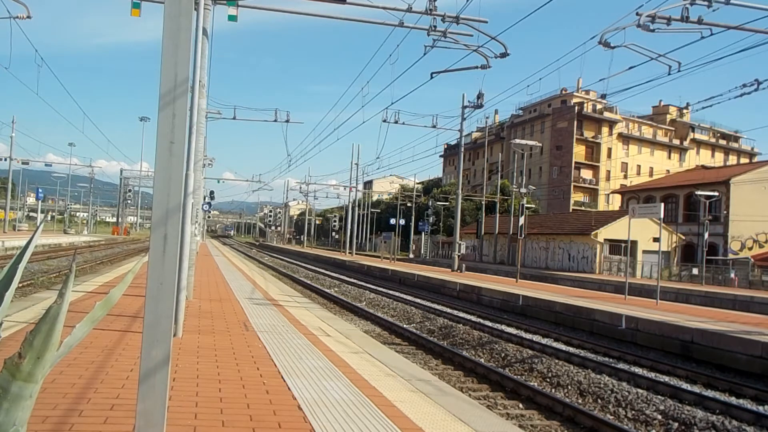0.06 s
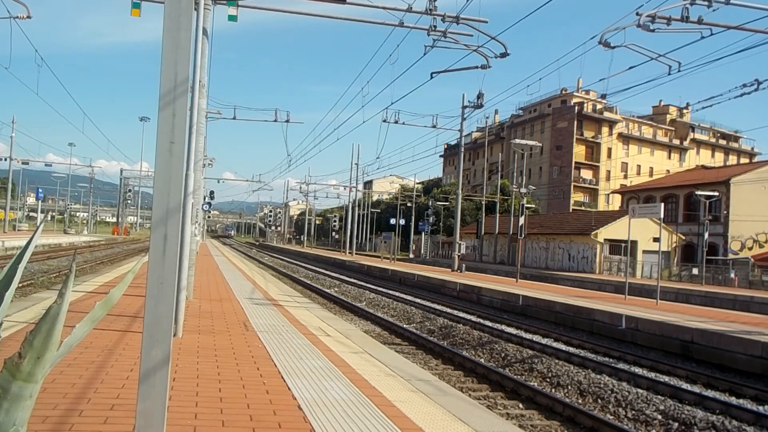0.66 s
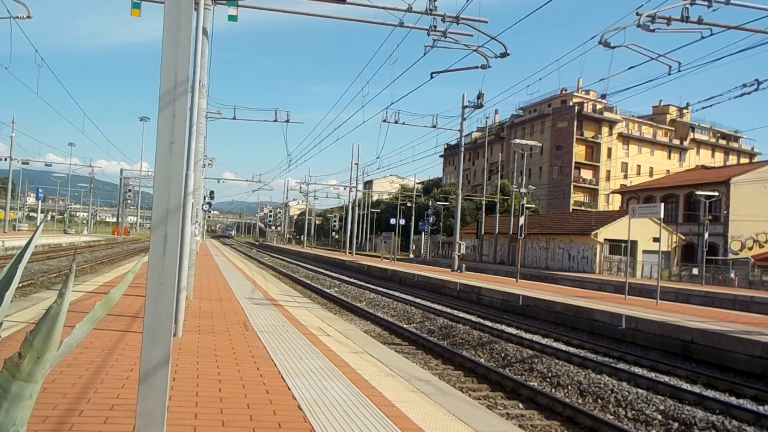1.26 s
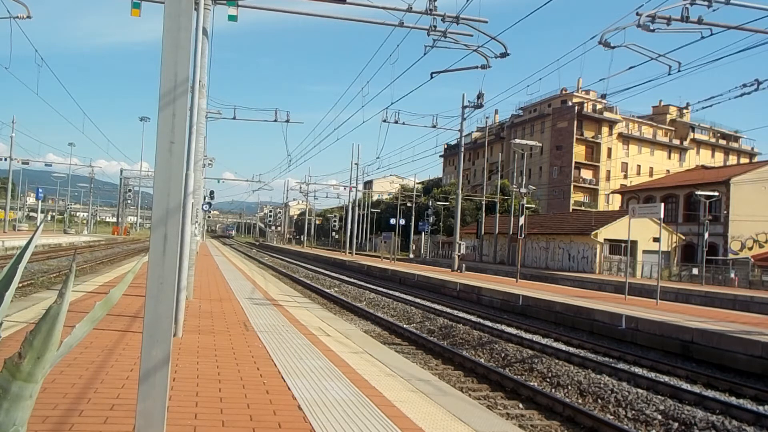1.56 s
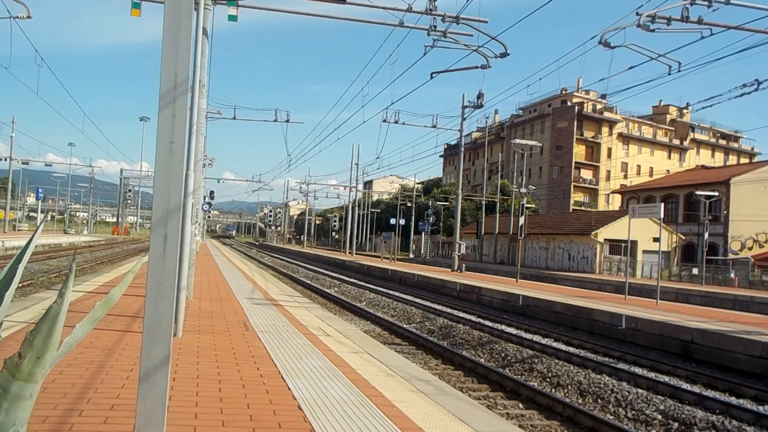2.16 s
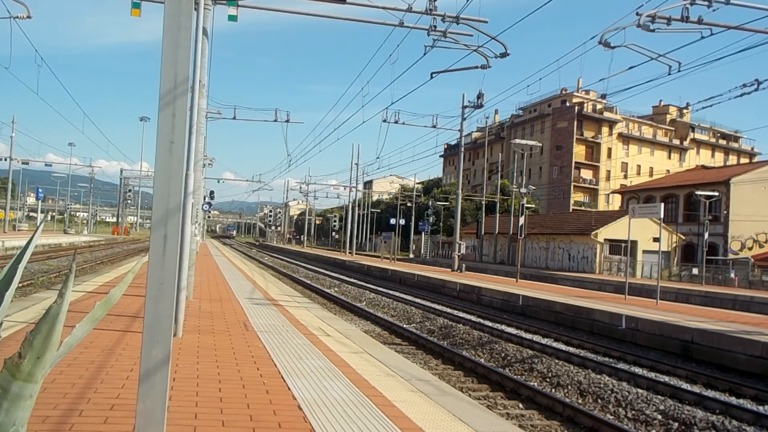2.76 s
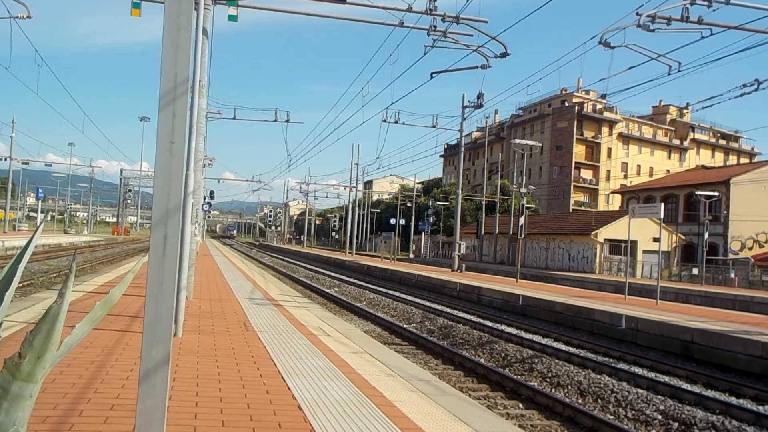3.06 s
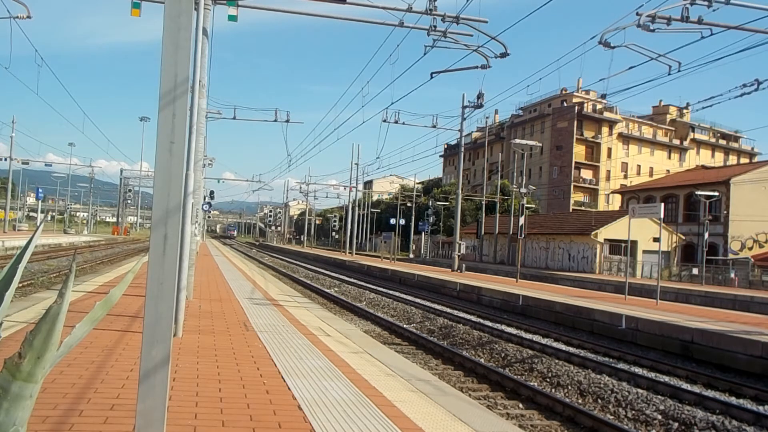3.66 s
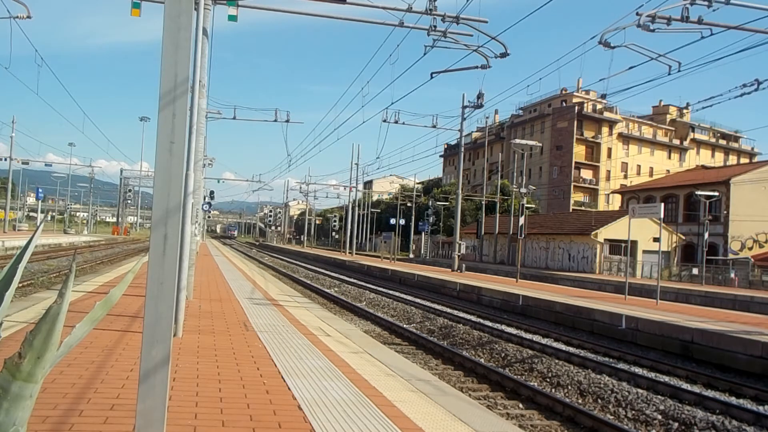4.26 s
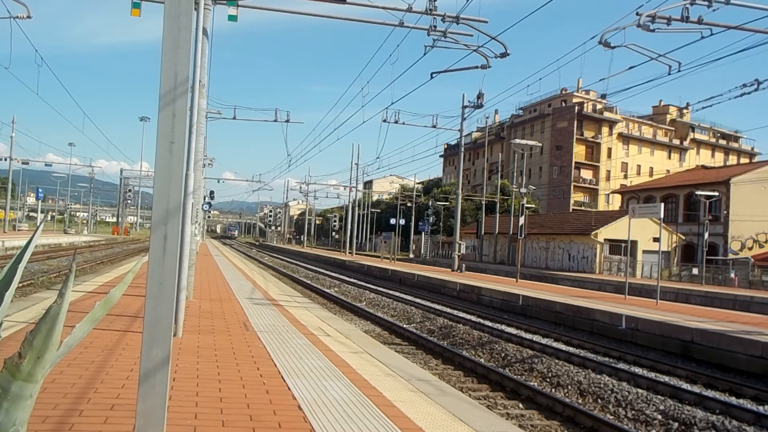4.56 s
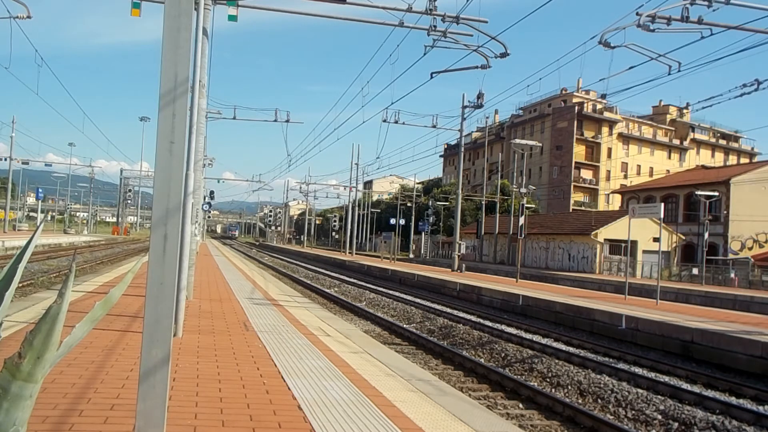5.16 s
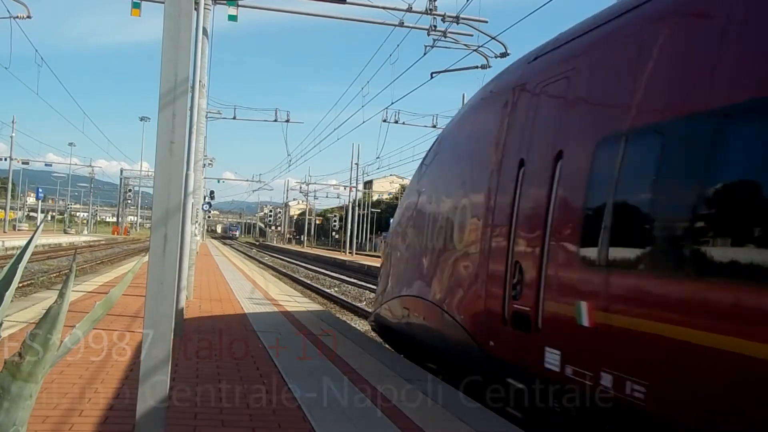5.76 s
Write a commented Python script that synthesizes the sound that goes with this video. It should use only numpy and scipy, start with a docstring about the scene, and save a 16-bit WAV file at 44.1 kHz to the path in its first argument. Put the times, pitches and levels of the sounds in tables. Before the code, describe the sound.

From a stereo microphone on a platform beside the track, a far-off electric train is heard as a metallic hum and sizzle in the rails, with occasional double clacks. It grows steadily into a deep rolling roar with rushing air. The clacks bunch together as the train speeds past after about five seconds, a wheel whines briefly downward in pitch, and the loudest hits overload into sharp ticks.

```python
"""A fast electric train, heard from a station platform through a stereo microphone near the track.
At first it is over 100 m off: the rails sing ahead of it and carry its knocks, two for each bogie
that crosses a joint. The roar of rough wheels on rough rails swells and deepens, and displaced air
rushes in. Just after five seconds the train passes some 8 m from the microphone and a wheel whines,
falling in pitch. The loudest knocks overload the recorder, which crackles."""
import sys
import numpy as np
from scipy import signal
from scipy.fft import rfft, irfft
from scipy.io import wavfile

SR = 44100
rng = np.random.default_rng(int(sys.argv[2]) if len(sys.argv) > 2 else 0)


def to_wav(s):
    """Save 16-bit WAV."""
    ch = np.atleast_2d(s).T  # columns
    pcm = np.round(np.clip(ch, -1, 1) * 32767)  # PCM
    wavfile.write(sys.argv[1], SR, pcm.astype(np.int16))


N = 264600
TIME = np.arange(N) / SR
BINS = np.maximum(np.fft.rfftfreq(N, 1 / SR), 1)

SPEED_M_PER_S, WHEELBASE_M, SOUND_M_PER_S = 23.8, 3.0, 343
# the leading bogie draws level with the microphone at PASS_S; from then on bogies stay NEAREST_M away
PASS_S, NEAREST_M = 5.27, 8.53
# fading with distance: (level at the nearest [dB], loss per tenfold distance [dB], track loss [dB/m])
ROAR_FADE = (-16, 7.91, 0.074)
WHEEL_FADE = (-24, 14.87, 0.043)
HISS_FADE = (-31, 16.2, 0.069)
RUMBLE_FADE = (-50.5, 12, 0.067)
RUSH_FADE = (-32, 1.7, 0.1)

# rolling roar from far down the line: (frequency [Hz], level [dB])
FAR_ROAR = [(250, -33.5), (350, -39), (450, -13.5), (520, -13), (600, -3), (720, 0.5), (810, -0.5),
            (940, 2.5), (1040, -3), (1130, -10.5), (1400, -20), (2000, -71)]
# rolling roar at the platform: (frequency [Hz], level [dB])
NEAR_ROAR = [(120, -44), (220, -33.5), (300, -30), (380, -13.5), (500, -5), (660, 7), (780, 7.5),
             (900, 0.5), (1040, 8), (1150, -5.5), (1400, -29.5), (2000, -86.5)]
# ringing of the wheels: (frequency [Hz], level [dB])
WHEEL_RING = [(800, -39.5), (1100, 4), (1220, 2), (1500, 0), (1650, -2), (1780, -5), (1960, -5.5),
              (2150, -16.5), (2420, -33.5), (3000, -40)]
# hiss of wheel on rail: (frequency [Hz], level [dB])
CONTACT_HISS = [(2000, -53.5), (2480, -23), (2780, -12.5), (2970, -17), (3250, -2), (3550, 1.5), (4100, -2),
                (5000, -5.5), (6000, -14), (6900, -14.5), (7700, -16.5), (8600, -26), (10500, -46),
                (13000, -62.5)]
# peaks and dips in the sound that the rails carry: (frequency [Hz], width [Hz], gain [dB])
RAIL_MODES = [(464, 30, 8), (597.6, 15, 7.5), (666, 41, 5), (748, 19, -5.5), (800, 55, 7), (939.7, 32, 7),
              (1032, 25, 7), (1270, 41, 4), (1320.6, 26, 11), (1450, 16, 1.5), (3440, 500, 1),
              (5340, 940, -1), (6260, 540, -2.5)]
# the rolling noise swells and sags about its steady rise: (time [s], gain [dB])
SWELL = [(0, -0.6), (.8, 0.96), (2.2, -0.1), (2.76, -1.5), (3.02, 1.5), (3.47, -2.3), (3.64, 2.9),
         (4.1, -0.06), (4.7, 0.2), (5.15, 0.5), (5.45, -2.4), (5.63, 0), (5.83, -4.5), (6, -2.5)]
# a bogie crosses a rail joint: (time [s], first axle's thud [dB], second axle's thud [dB],
# wheel clang against the thud [dB], rail sizzle against the thud [dB])
JOINT_CROSSINGS = [(.064, -34, -45, -11, -19), (.284, -26, -44, -24, -34), (1.266, -37.5, -33.5, -2.5, -31),
                   (2.408, -22, -28.5, -24, -38), (2.853, -18, -19.5, -11, -19.5),
                   (3.581, -16.5, -21, -17.5, -19), (4.152, -10.5, -17.5, -17, -29),
                   (4.342, -14.5, -27, -21, -30), (4.837, -12.5, -18, -13, -19.5),
                   (5.000, -12.5, -16.5, -13.5, -38), (5.178, -13, -18.5, -7, -27),
                   (5.275, -17.5, -17, -3.5, -12), (5.315, -13.5, -22, -4.5, -22),
                   (5.400, -17, -12, -10.5, -21), (5.424, -18, -28.5, -4, -17),
                   (5.443, -8.5, -10.5, -19, -41)]
# a blow sets the rail head ringing: (frequency [Hz], width [Hz], gain [dB])
RAIL_HEAD_MODES = [(4250, 2400, 8), (7000, 3100, 7)]
# the wheel's whine flares up near the microphone: (time [s], half length [s], level [dB])
WHINE_FLARES = [(5.216, 0.054, -22), (5.545, 0.054, -26), (5.72, .07, -25.5)]
# rumble of displaced air: (frequency [Hz], level [dB])
AIR_RUMBLE = [(15, 9.5), (30, -2.5), (60, 4.5), (120, 0), (200, 4), (320, 3), (600, -23)]
# air rushing round the bogies: (frequency [Hz], level [dB])
AIR_RUSH = [(150, -25.5), (260, -15.5), (340, -5), (420, 2), (500, 6.5), (700, -27)]
# the rails' high sizzle, far ahead of the train: (frequency [Hz], level [dB])
SING_SPECTRUM = [(5200, -28.5), (6000, -11), (6900, 0), (7500, -1.5), (8200, -21)]
# rise of that sizzle at the platform: (time [s], level [dB])
SING_LEVEL = [(0, -80), (.9, -74.5), (1.6, -65), (2.3, -65), (3.2, -63.5), (4.2, -56)]
# the two microphone ports: (frequency [Hz], left over right [dB], lag of left [rad], likeness [0-1])
MIC_PORTS = [(100, .5, -1, .55), (227, 0, 1.1, 0.8), (320, 5, 0.75, 1), (420, 5, 0.84, 0.82),
             (645, -1.5, 1.01, 0.94), (746, 0.1, 0.85, 1), (1050, -4.5, 1.01, 0.86), (1350, -6, 0.82, 1),
             (1880, -6, 0.75, 1), (2450, -3, -1.5, 0.9), (3230, 0, 0.5, 1), (4600, -3, 0.96, 0.3),
             (5860, -1, 1.5, 0.8), (7300, -9, 3, 0.3), (8600, -1.5, 2, 0.4), (12000, -6.5, 0, .3)]
# the recorder's equaliser, after its input stage: (frequency [Hz], gain [dB])
TREBLE_LIFT = [(5000, 3), (9500, 12.5), (14000, 26)]
# electronic hiss, mostly in the lifted treble: (frequency [Hz], level [dB])
SELF_NOISE = [(2500, -12.5), (8200, -11.5), (9500, -3), (11500, 1), (15500, -0.5)]


def rolling():
    """Rough wheels on rough rails; the rail's resonances fade as the bogies near the microphone."""
    near = nearness()
    swell_db, = in_time(SWELL)
    contact = drift(2.2)   # unevenness of the contact, felt in every band

    def arriving(far_spectrum, near_spectrum):
        """Sound carried by the rails gives way to sound straight from the bogies."""
        by_rail = np.sqrt(1 - near) * noise(colour(far_spectrum, RAIL_MODES))
        return by_rail + np.sqrt(near) * noise(colour(near_spectrum))

    roar = arriving(FAR_ROAR, NEAR_ROAR) * from_db(faded_db(ROAR_FADE) + swell_db + 0.42 * contact)
    wheels = arriving(WHEEL_RING, WHEEL_RING) * from_db(faded_db(WHEEL_FADE) + swell_db + 0.3 * contact)
    hiss_db = faded_db(HISS_FADE) + 0.56 * swell_db + 0.94 * contact
    hiss = arriving(CONTACT_HISS, CONTACT_HISS) * from_db(hiss_db + 0.85 * drift(30))
    return roar + wheels + hiss


def knocks(far_thud_hz=837, near_thud_hz=1084.3, hz_per_clang_db=18, max_lead_s=0.025, max_lead_m=63):
    """Bending waves run faster in the treble, so a far knock arrives as a sizzle and then a thud."""
    near, ahead = nearness(), track_ahead()
    clang = noise(colour(WHEEL_RING, RAIL_MODES))
    sizzle = noise(colour(CONTACT_HISS, RAIL_HEAD_MODES))
    # the sleepers' low thump travels through the air, so it fades with distance
    thump = noise(colour(AIR_RUSH) + from_db(-26) * colour(AIR_RUMBLE)) * np.sqrt(near + 0.1)
    cluster = mode_cluster(width_hz=200)
    thuds, rest = np.zeros((2, 2, N))
    for s, thud_db, clang_db, sizzle_db in axle_blows():
        at = int(s * SR)
        # close by, a blow with more clang also thuds higher
        close_hz = near_thud_hz + hz_per_clang_db * (clang_db - thud_db)
        hz = (1 - near[at]) * far_thud_hz + near[at] * close_hz
        lead_s = max_lead_s * min(ahead[at] / max_lead_m, 1)
        span = slice(max(int((s - .1) * SR), 0), int((s + .4) * SR))
        age = TIME[span] - s
        thud = (cluster[:, span] * np.exp(2j * np.pi * hz * age)).real
        thuds[:, span] += thud * from_db(thud_db) * burst(age, 0.019, 0.01, 0.18)
        rest[:, span] += thump[:, span] * from_db(thud_db - 15.5) * burst(age, 0.012, 0.0051, 0.063)
        rest[:, span] += clang[:, span] * from_db(clang_db) * burst(age, 0.018, 0.0063, 0.11)
        rest[:, span] += sizzle[:, span] * from_db(sizzle_db) * burst(age + lead_s, 0.0085, 0.0098, 0.18)
    # keep the thuds in the middle range, 480-1300 Hz
    thud_band = signal.butter(3, [480, 1300], "band", fs=SR, output="sos")
    return rest + signal.sosfilt(thud_band, thuds)


def axle_blows():
    """A bogie strikes twice, a wheelbase apart: (time [s], thud [dB], clang [dB], sizzle [dB])."""
    for s, first_db, second_db, clang_db, sizzle_db in JOINT_CROSSINGS:
        for delay, thud_db in ((0, first_db), (WHEELBASE_M / SPEED_M_PER_S, second_db)):
            yield s + delay, thud_db, thud_db + clang_db, thud_db + sizzle_db


def mode_cluster(width_hz):
    """The slow wandering of a cluster of close modes, centred on 0 Hz, with its strength evened."""
    band = signal.hilbert(noise(1 / (1 + ((BINS - SR / 4) / width_hz) ** 4)))
    evened = rms_one(band / np.abs(band) ** .7)
    return evened * np.exp(-.5j * np.pi * np.arange(N))   # shift down from SR / 4


def burst(age, rise_s, hold_s, t60_s):
    """Envelope of a blow: it builds up, holds while the wheel crosses, and dies."""
    return np.clip(1 + age / rise_s, 0, 1) ** 2 * from_db(-60 * np.maximum(age - hold_s, 0) / t60_s)


def wheel_whine(rest_hz=1604, width_hz=32, mic_distance_m=3.6):
    """One wheel mode, shaken at random by the rail; its Doppler shift falls as it passes."""
    ahead = SPEED_M_PER_S * (PASS_S - TIME)
    closing_speed = SPEED_M_PER_S * ahead / np.hypot(ahead, mic_distance_m)
    phase = 2 * np.pi * np.cumsum(rest_hz / (1 - closing_speed / SOUND_M_PER_S)) / SR
    tone = rms_one(drift(width_hz) * np.cos(phase) + drift(width_hz) * np.sin(phase))
    flares = sum(from_db(db) * np.exp(-((TIME - s) / half) ** 2) for s, half, db in WHINE_FLARES)
    return np.array([tone * flares, np.zeros(N)])   # all direct, none scattered


def displaced_air(screen_m=43, edge_m=3.6, screen_db=-12):
    """Air rumbles and rushes round the bogies; the rush is screened until they are screen_m away."""
    screened = (1 + np.tanh((track_ahead() - screen_m) / edge_m)) / 2
    rumble = noise(colour(AIR_RUMBLE)) * from_db(faded_db(RUMBLE_FADE) + 0.41 * drift(8))
    rush_db = faded_db(RUSH_FADE) + screen_db * screened
    return rumble + noise(colour(AIR_RUSH)) * from_db(rush_db + 2.0 * drift(6.2))


def rail_sing():
    """A thin, restless sizzle carried along the steel to the platform."""
    level_db, = in_time(SING_LEVEL)
    return noise(colour(SING_SPECTRUM)) * from_db(level_db + 1.1 * drift(12))


def microphone(sound, notch_hz=8090, notch_width_hz=840):
    """The housing shades and delays each port in its own way and cuts one narrow notch."""
    balance_db, lag, alike = in_frequency(MIC_PORTS)
    alike = np.clip(alike, 0, .999)
    direct, scattered = rfft(sound)
    common, apart = np.sqrt((1 + alike) / 2) * direct, np.sqrt((1 - alike) / 2) * scattered
    tilt = from_db(balance_db / 2) * np.exp(-.5j * lag)
    tilt_rms = np.sqrt((np.abs(tilt) ** 2 + np.abs(tilt) ** -2) / 2)
    left, right = (common + apart) * tilt, (common - apart) / tilt
    offset = (BINS - notch_hz) / notch_width_hz
    notch = np.abs(offset) / np.sqrt(1 + offset ** 2)
    return irfft(np.array([left, right]) * notch / tilt_rms, N)


def overload(x, knee=0.48, squash=0.47):
    """The input stage squashes crests above a sharp knee; the treble lift turns corners into ticks."""
    lift = colour(TREBLE_LIFT)
    unlifted = irfft(rfft(x) / lift, N)
    crests = unlifted - np.clip(unlifted, -knee, knee)
    return irfft(rfft(unlifted - squash * crests) * lift, N)


def track_ahead():
    """Metres that the leading bogie has still to run to draw level with the microphone."""
    return SPEED_M_PER_S * np.maximum(PASS_S - TIME, 0)


def faded_db(fade):
    """Level of a sound that spreads through the air and is damped along the track."""
    nearest_db, spreading_db, damping_db_per_m = fade
    ahead = track_ahead()
    distance = np.hypot(ahead, NEAREST_M)
    return nearest_db - spreading_db * np.log10(distance / NEAREST_M) - damping_db_per_m * ahead


def nearness(reach_m=52, max_share=0.912):
    """Share of the sound that comes straight from the bogies; the rest comes along the rails."""
    return np.clip(max_share * (1 - track_ahead() / reach_m), 0, 1)


def noise(gain):
    """Two unrelated noises of one colour, the direct and the scattered sound; rms 1."""
    return rms_one(irfft(rfft(rng.standard_normal((2, N))) * gain, N))


def colour(spectrum, modes=()):
    """Gain by frequency of a spectrum with resonances on it; it falls steeply past its last point."""
    bumps_db = sum(db / (1 + (2 * (BINS - hz) / width) ** 2) for hz, width, db in modes)
    fall = np.minimum(spectrum[-1][0] / BINS, 1) ** 5
    return from_db(in_frequency(spectrum)[0] + bumps_db) * fall


def drift(rate_hz):
    """Random wandering, mostly slower than rate_hz; rms 1."""
    return rms_one(irfft(rfft(rng.standard_normal(N)) / (1 + (BINS / rate_hz) ** 2), N))


def in_time(rows):
    """Each column of a curve at every sample."""
    s, *columns = np.transpose(rows)
    return [np.interp(TIME, s, c) for c in columns]


def in_frequency(rows):
    """Each column of a spectrum at every frequency."""
    hz, *columns = np.transpose(rows)
    return [np.interp(np.log(BINS), np.log(hz), c) for c in columns]


def from_db(db):
    """Decibels to gain."""
    return 10 ** (np.asarray(db) / 20)


def rms_one(x):
    """Scale to unit power."""
    return x / np.sqrt(np.mean(np.abs(x) ** 2) + 1e-20)


def scene():
    """The train's sounds meet at the microphone on the platform."""
    train = rolling() + rail_sing() + knocks() + wheel_whine() + displaced_air()
    edge_fades = np.clip(np.minimum(TIME, TIME[::-1]) / .004, 0, 1)
    return microphone(train * edge_fades)


def record(dry):
    """The recorder overloads, adds faint electronic hiss and cuts the top steeply."""
    hiss_db = -70 + np.array([[-1.1], [1.1]])   # left, right
    hiss = noise(colour(SELF_NOISE)) * from_db(hiss_db + .7 * drift(90))
    top_cut = signal.ellip(10, .1, 90, 15750, fs=SR, output="sos")
    return signal.sosfilt(top_cut, overload(dry) + hiss)


dry = scene()
out = record(dry)
to_wav(out)
```